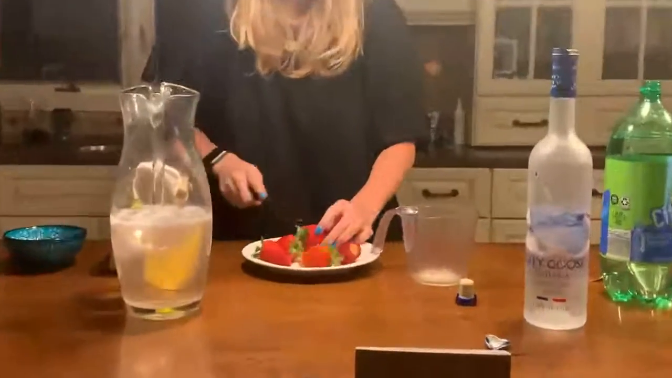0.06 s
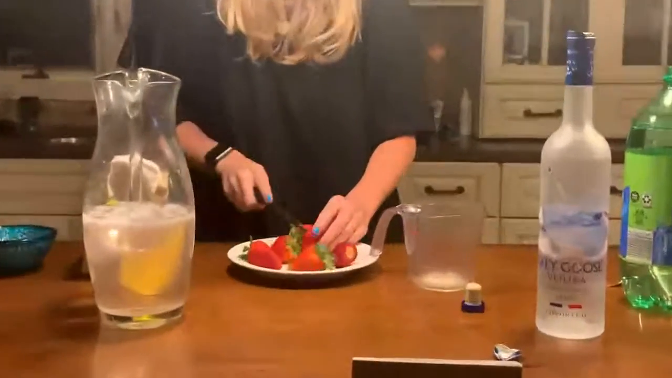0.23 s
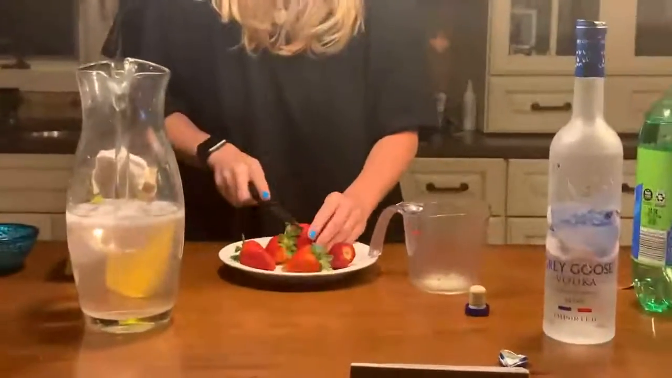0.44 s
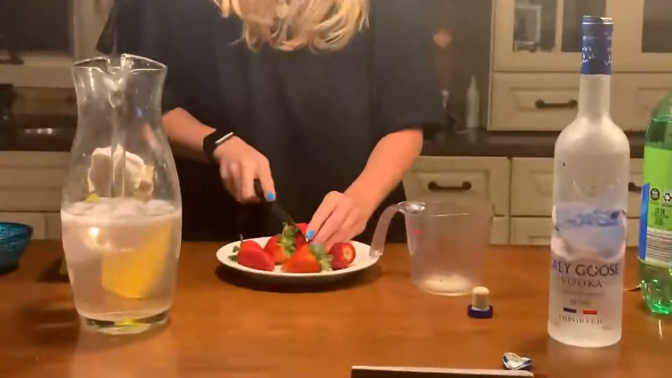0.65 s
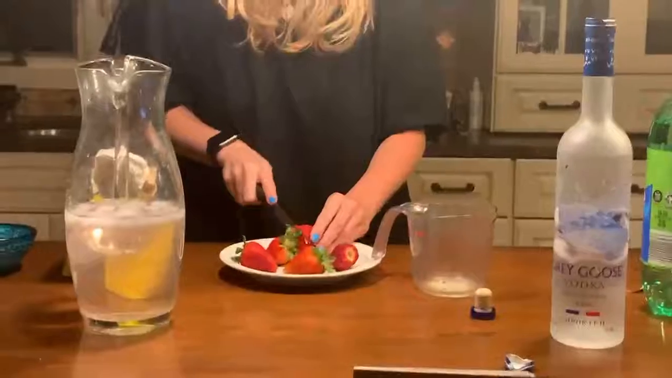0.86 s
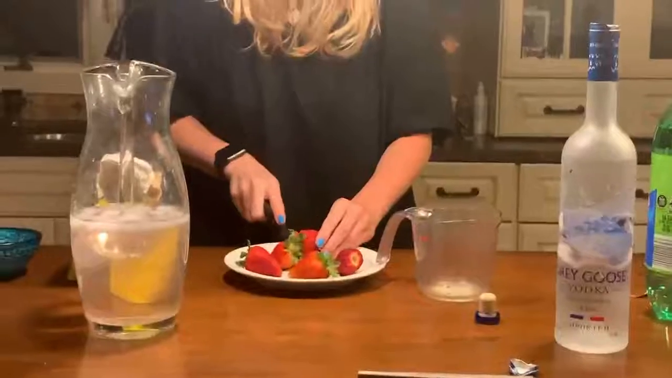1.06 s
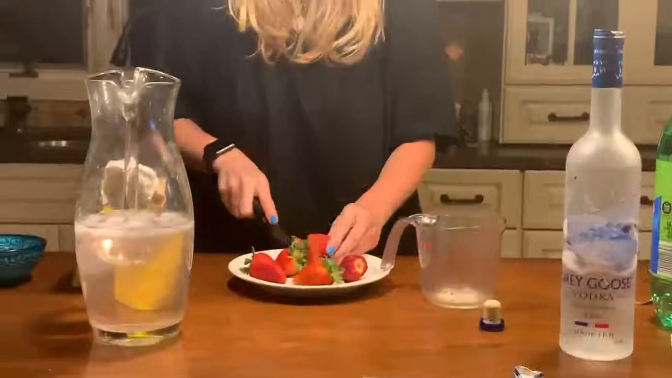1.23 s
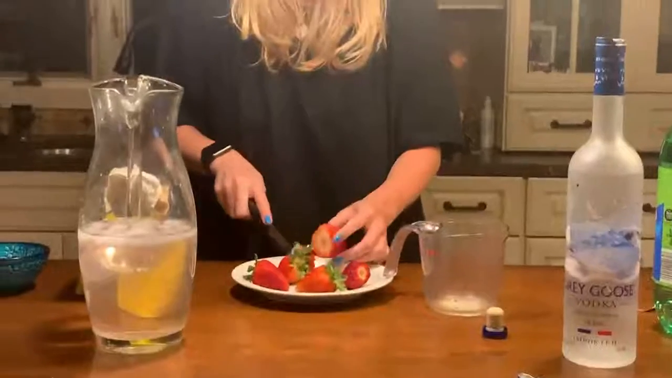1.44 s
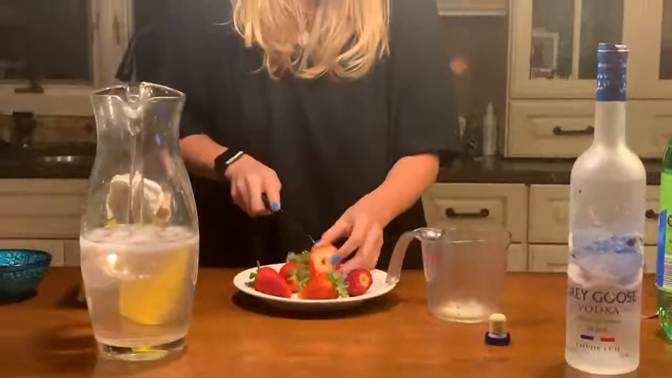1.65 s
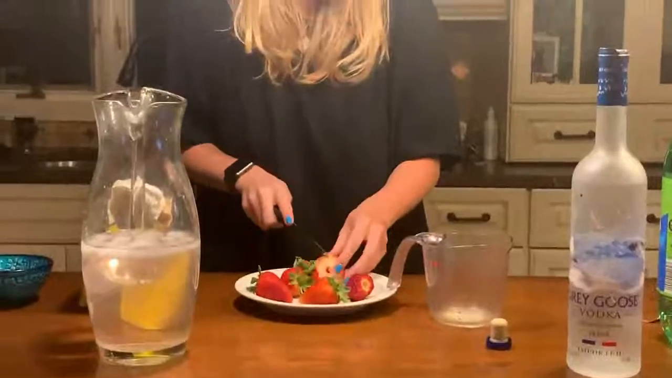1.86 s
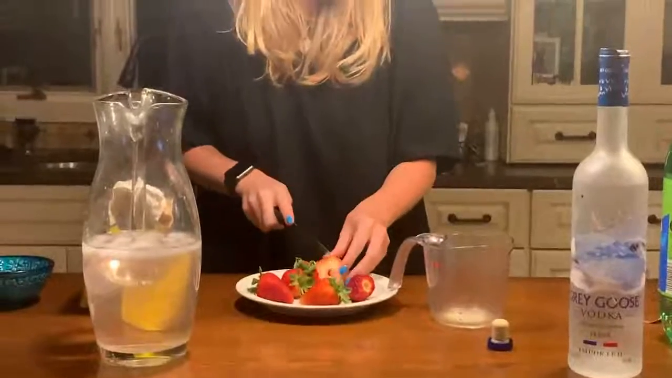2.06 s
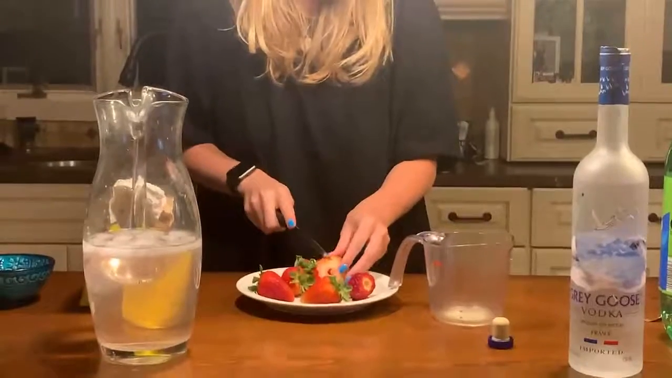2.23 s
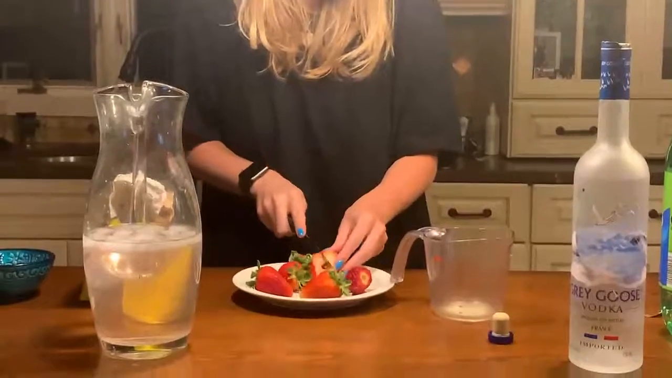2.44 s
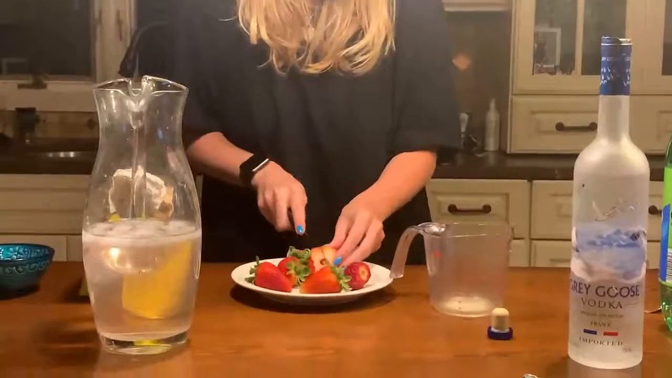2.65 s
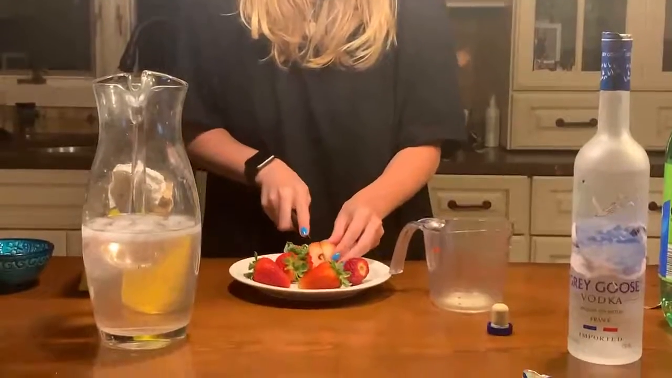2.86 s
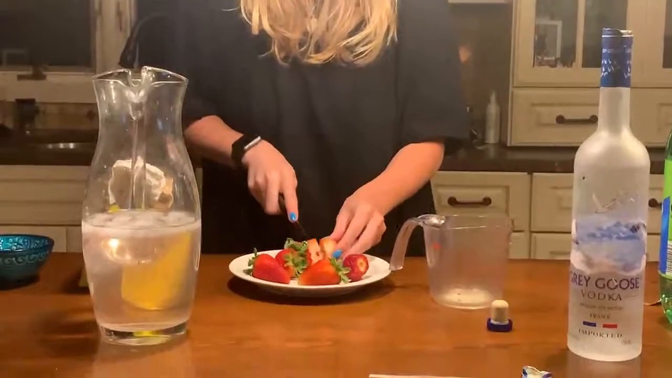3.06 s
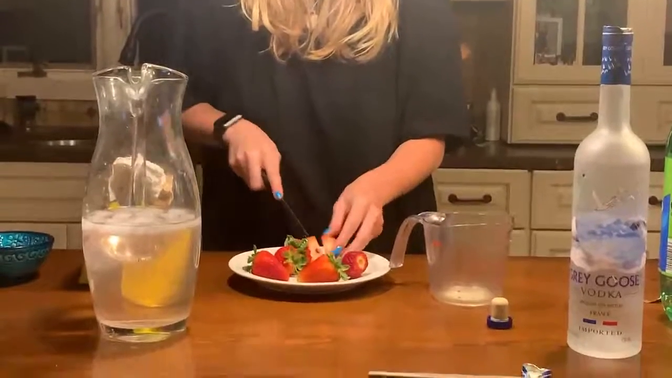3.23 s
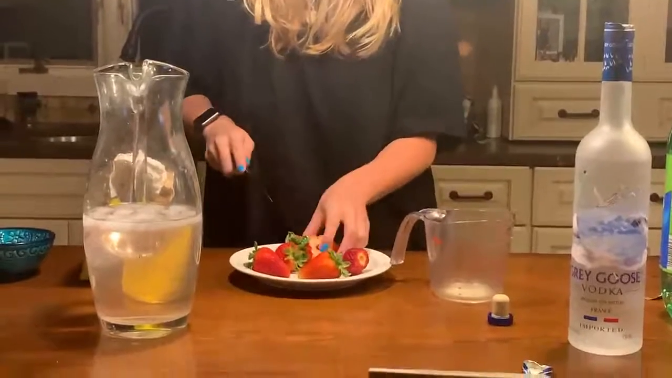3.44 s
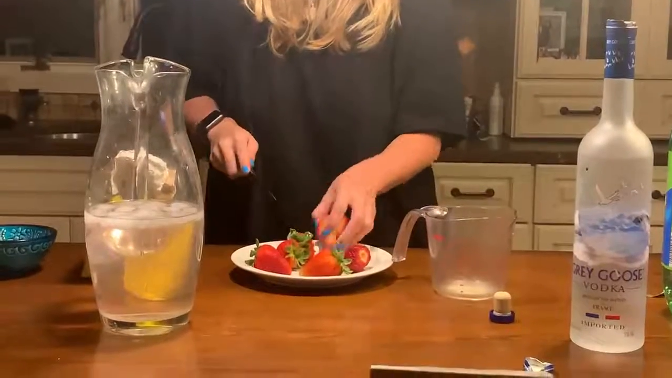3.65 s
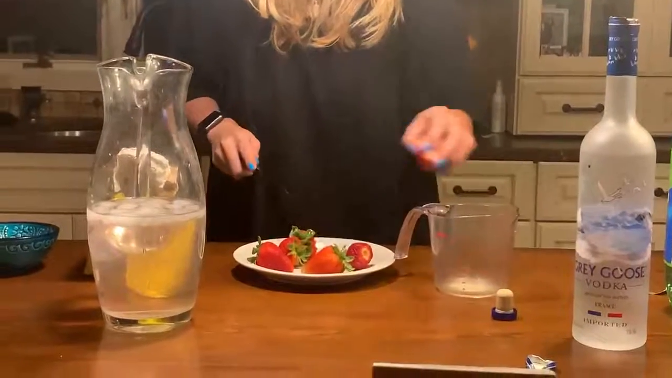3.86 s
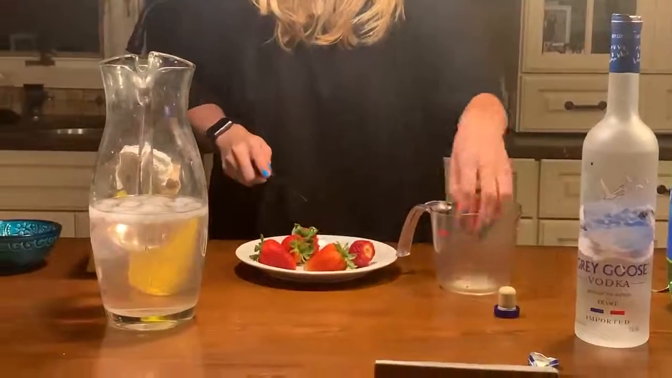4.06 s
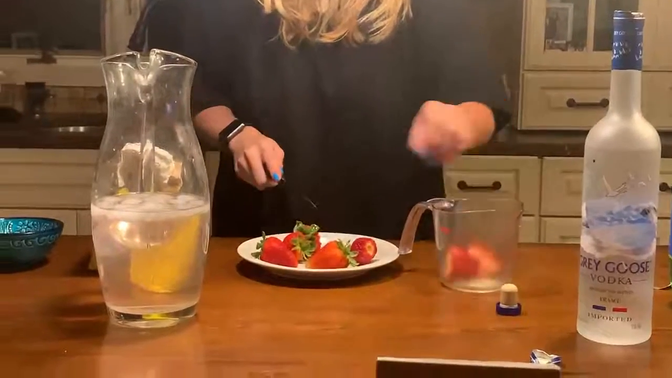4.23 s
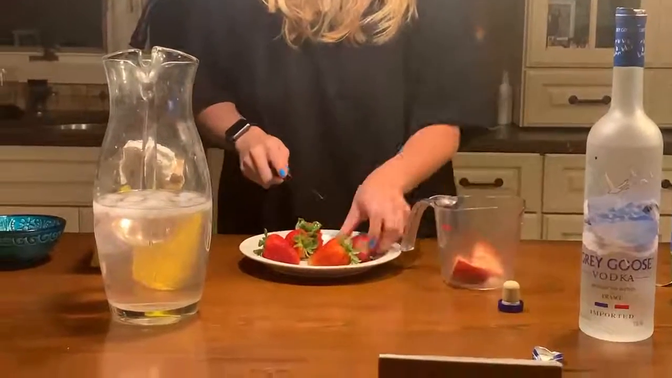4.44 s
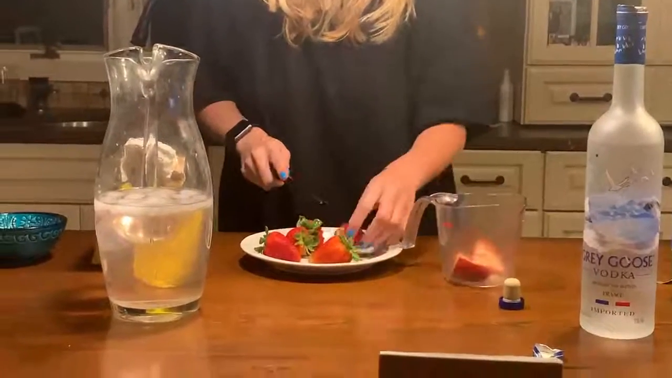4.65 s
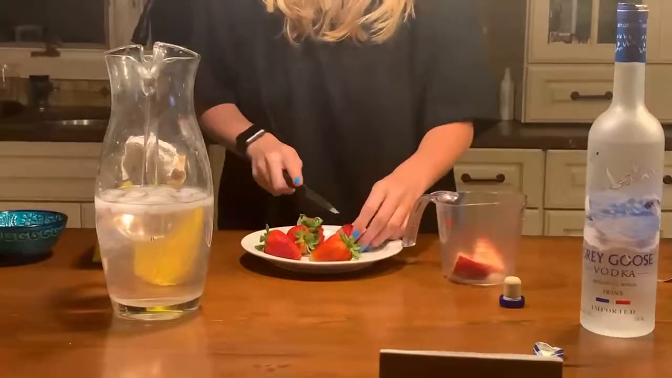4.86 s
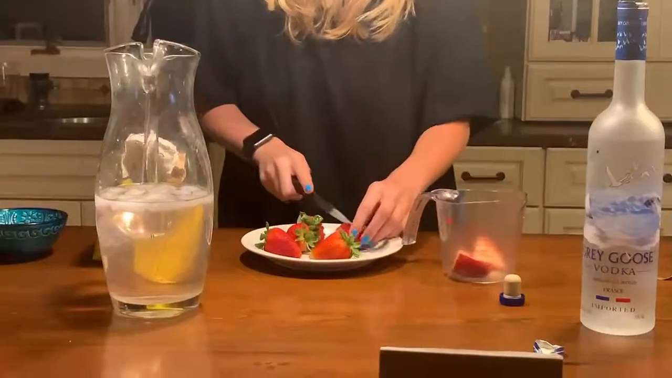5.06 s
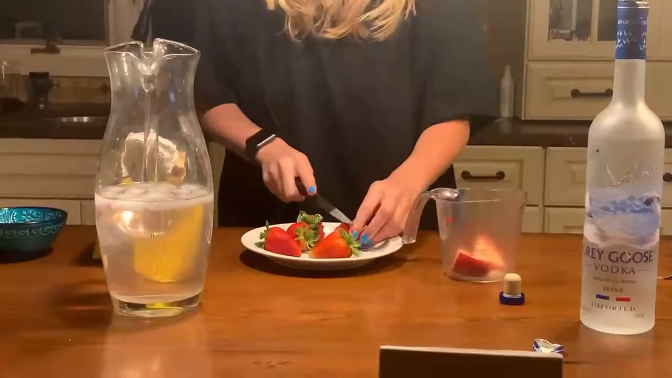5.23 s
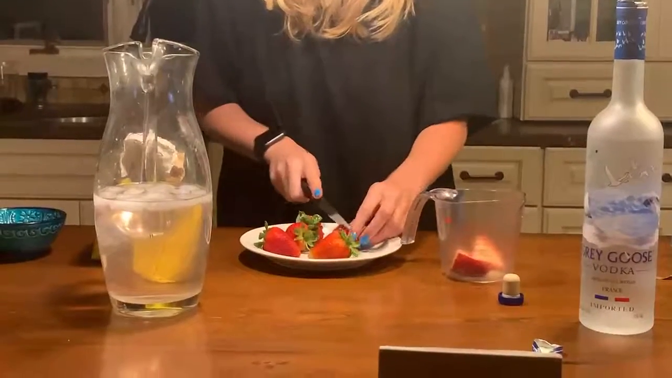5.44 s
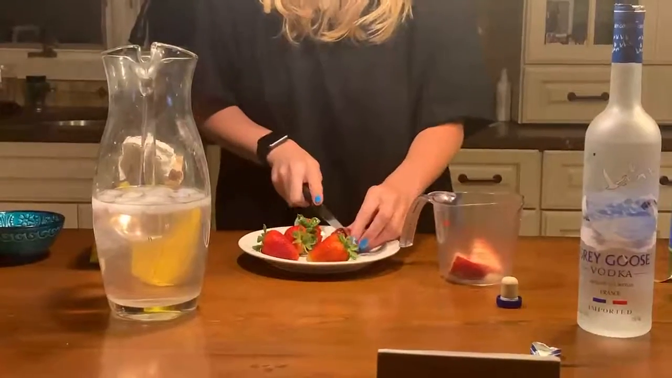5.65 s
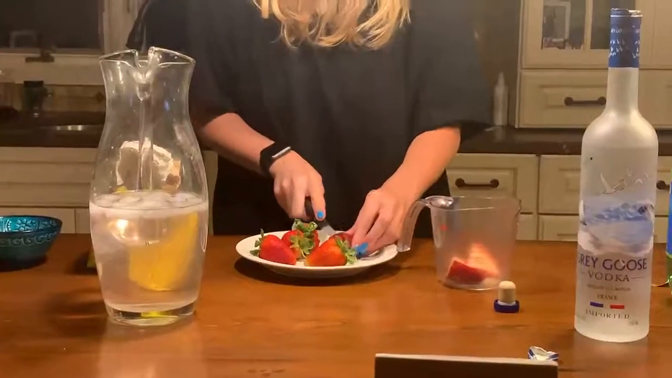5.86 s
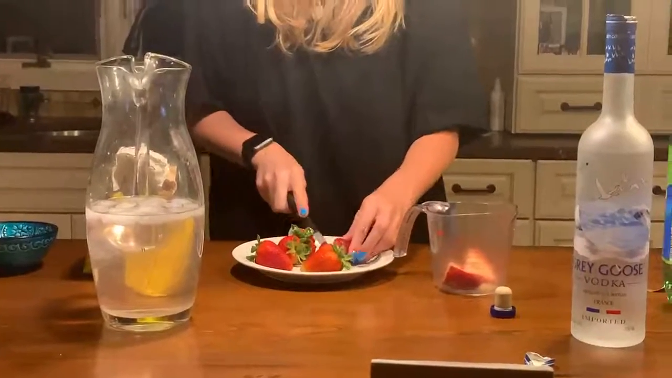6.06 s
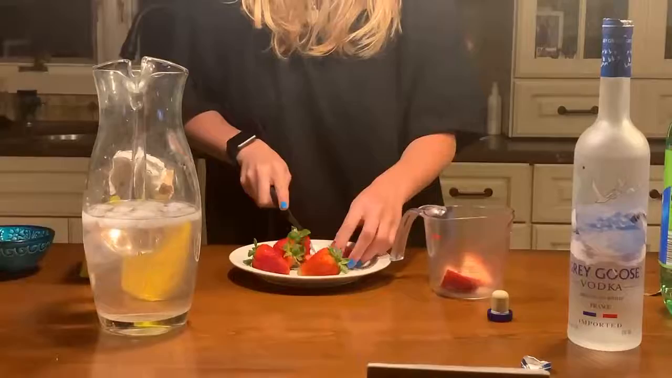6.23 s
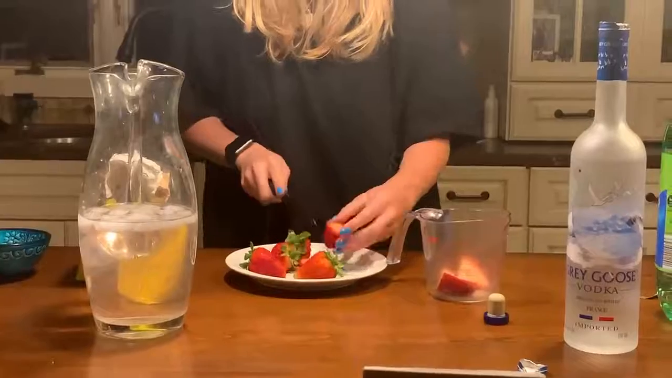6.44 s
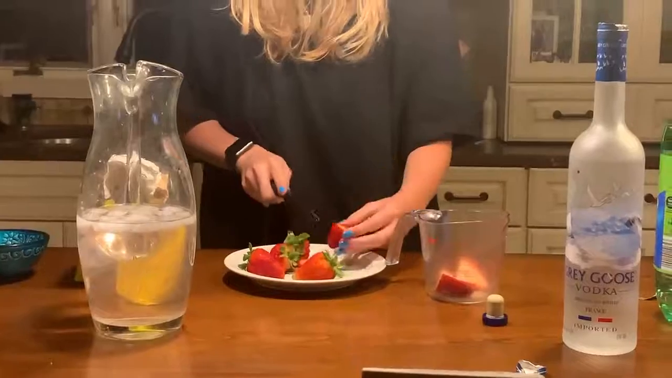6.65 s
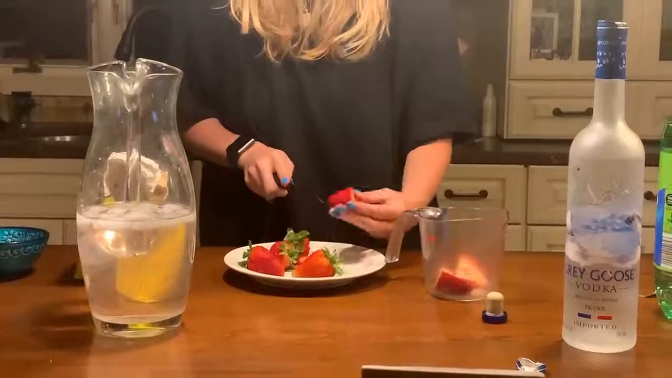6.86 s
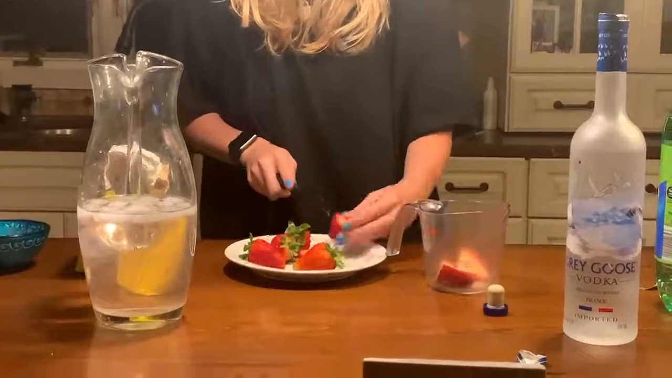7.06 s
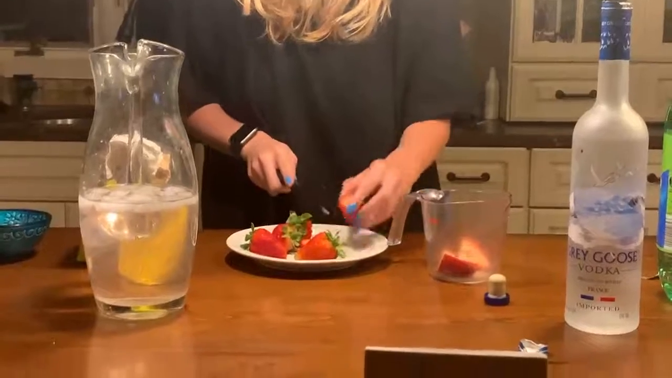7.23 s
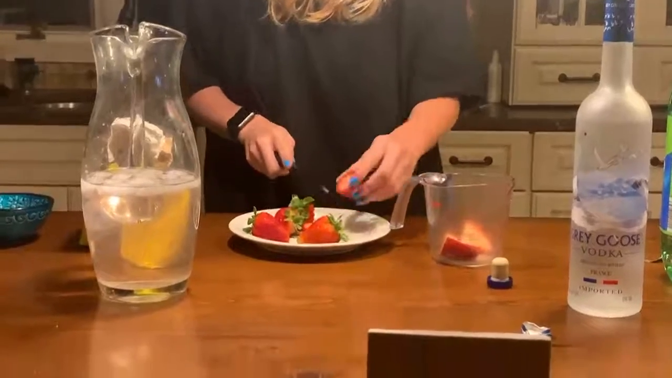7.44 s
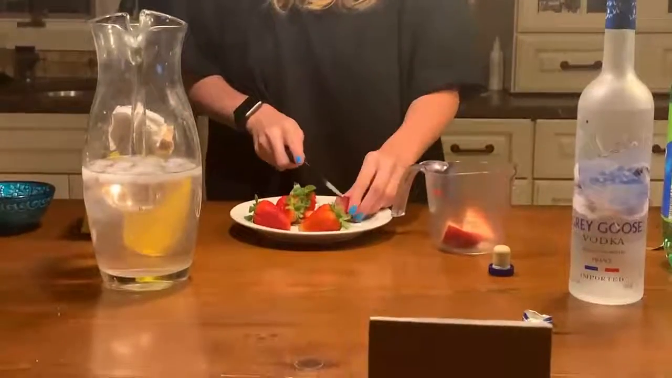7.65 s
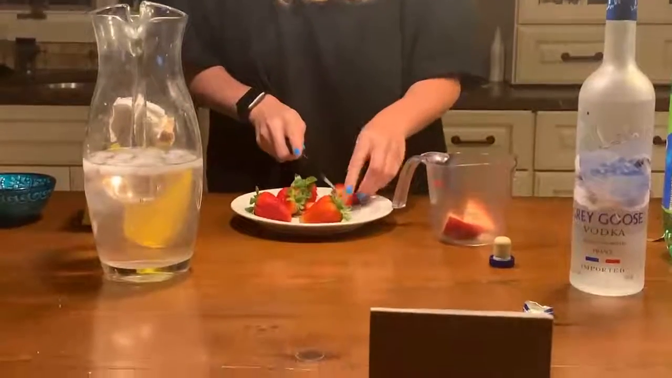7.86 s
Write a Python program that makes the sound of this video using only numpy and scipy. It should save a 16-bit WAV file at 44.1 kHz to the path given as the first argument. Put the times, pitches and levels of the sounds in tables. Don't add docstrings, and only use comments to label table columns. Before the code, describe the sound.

A quiet home kitchen with a low, slightly wavering fridge hum, soft air noise and a very faint whine throughout. At about 0.6 to 0.95 s a knife saws soft wet fruit with faint ticks, then at 1.0 s the blade lands hard on a ceramic plate: a bright, sharp clack, the loudest event, with a short room tail. A small scrape follows near 1.2 s. Gentle knocks and moist cutting come at 2.35 to 2.8 s, ending in a softer, thumpier hit at 2.8 s. From 3.05 to 3.25 s the edge scrapes the glaze in quick gritty pushes, leaving a faint glassy ring. At 4.2 s fruit drops into a hollow plastic jug with a dull plop and small bounces. Faint slicing at 5.5 s leads to another firm, more damped clack at 5.9 s. Afterwards there are only tiny taps around 7.05 and 7.6 to 7.85 s. A stereo phone listens from a metre or two.

```python
import sys
import numpy as np
from scipy import signal
from scipy.fft import rfft, irfft, next_fast_len
from scipy.io import wavfile
from scipy.ndimage import uniform_filter1d

SR = 44100
rng = np.random.default_rng(int(sys.argv[2]) if len(sys.argv) > 2 else 0)


def generate_wav(sig):
    pcm = np.round(np.clip(np.atleast_2d(sig).T, -1, 1) * 32767).astype(np.int16)
    wavfile.write(sys.argv[1], SR, pcm)


def how_loud(loudness_db):
    steps = np.asarray(loudness_db, float) / 20
    return 10 ** steps


N = 348390
TIME_S = np.arange(N) / SR
HIT_S = TIME_S[:11025]

# (frequency [Hz], density [dB/Hz])
AIR_SPECTRUM = [(12, -45.5), (20, -17), (58, -4.5), (184, -4), (258, -7), (382, -6), (416, -11.5),
                (583, -14), (709, -21.5), (1790, -33), (2810, -40), (3620, -39), (8650, -41), (10200, -36),
                (16500, -47.5)]
# (frequency [Hz], likeness [-1..1])
AIR_LIKENESS = [(60, 0.3), (300, 0.3), (700, 0.14), (1400, -0.19), (3000, -0.1)]
# (frequency [Hz], width [Hz], rms level [dB], wander [dB])
MOTOR_LINES = [(56.93, 8, -78, -1.5), (82, 10, -80, -1), (177.5, 2.7, -83, 0.5), (347, 20, -73, 2.5),
               (383.7, 21, -70.5, 2.5), (561, 7.8, -80, 3), (751, 5, -89.5, 1), (3550, 72, -91, 1.37),
               (7150, 50, -103, 5), (10500, 60, -106, 4.5)]
# (time [s], motor lines [dB], air noise [dB], extra whine [dB])
COMPRESSOR_LOAD = [(0, 4, 0, 5), (1, 3.5, 2, 1.5), (1.999, 4.5, 0.5, -2.5), (3.001, 8, -2, -2),
                   (3.799, 0.5, 0.5, 6.5), (4.5, 5, 0, 0), (5.3, 2, 0.5, 3), (6, 5.5, -0.5, 4),
                   (7.001, 0, 0.5, -1), (7.9, 4, 0.5, -2.5)]
# (time [s], peak [dB], frequency [Hz], rise [s], t60 [s])
GLASS = [
    (0, -61, 2920, 0.01, 0.13),
    (3.22, -38.5, 2844, 0.015, 0.37),
    (4.4, -60, 2850, 0.052, 0.33),
    (4.42, -73, 4096, 0.0096, 0.1),
    (1.85, -74.5, 1747, 0.18, 2),
    (4.55, -80.5, 1807, 0.12, 1.8),
    (7.119, -81, 1752, .05, 1.5),
]
# (time [s], peak [dB], frequency
# [Hz], t60 [s])
KNOCKS = [(.045, -83, 2730, 0.0061), (0.717, -57, 4500, .004), (0.731, -55, 3314, .006),
          (0.979, -39, 5770, 0.014), (1.41, -57.5, 14400, 0.0059), (1.47, -63, 11900, 0.002),
          (2.355, -57.5, 1610, 0.015), (2.475, -51, 886, 0.044), (2.539, -54, 950, .02),
          (2.553, -45.5, 960, 0.02), (4.2, -41.5, 61.5, 0.37), (5.542, -51, 1390, 0.015),
          (5.9, -36, 5620, 0.017), (4.179, -29.5, 1000, 0.028), (0.995, -36.5, 1090, 0.02),
          (7.053, -70, 1394, 0.0037), (7.054, -58.5, 500, 0.013), (7.628, -54.5, 937, 0.057),
          (7.632, -46.5, 410, 0.027), (7.686, -53, 695, 0.027), (7.71, -64, 770, 0.024),
          (7.824, -64.5, 4180, 0.023), (7.827, -66, 5500, 0.0051), (7.85, -68, 3620, 0.028)]
# (time of most effort [s], level [dB], hold [s], hiss [dB], brightness [dB])
STROKES = [(0.64, -69, 0.019, -3, -1.5), (0.715, -75, 0.014, -12, -7), (0.824, -58.5, 0.011, -11, -0.5),
           (0.939, -52.5, 0.049, -9.5, 6.5), (2.35, -66.5, 0.051, -19, -1.5),
           (2.439, -56.5, 0.043, -25, -2.5), (2.555, -65, .008, -30, -2), (2.604, -61.5, .07, -18.5, 7),
           (2.797, -63.5, .018, -16.5, 8.5), (5.475, -74, 0.026, -21.5, -6.5),
           (5.532, -65, 0.0089, -14.5, -1.5), (5.664, -62, 0.022, -13.5, 1.5),
           (5.811, -67, 0.064, -9.5, 12), (5.877, -60, 0.044, -14, 1)]
# (frequency [Hz], density [dB/Hz])
FLESH_SPECTRUM = [(150, -36), (250, -9), (381, -3), (605, -15), (922, -1.5), (1150, -9), (2300, -9),
                  (2660, -15.5), (7120, -31.5), (8000, -44), (10400, -73.5), (17600, -120)]
# (time [s], peak [dB], length [s])
EDGE_TICKS = [(.655, -61.5, 0.00052), (.68, -61.5, 0.00044), (.718, -51.5, .001), (.733, -56, 0.0011),
              (.994, -30.5, 0.00075), (1.19, -48, 0.0042), (2.816, -39, 0.0021), (3.05, -60, .002),
              (5.65, -57, .0005), (5.907, -33, .0012), (6.47, -59.5, 0.00045), (7.826, -50.5, 0.0014)]
# (frequency [Hz], density [dB/Hz])
EDGE_SPECTRUM = [(1500, -29.5), (3500, -9.5), (7000, -8), (10500, 0), (15000, 1), (17000, -4.5)]
# (time [s], peak [dB], crack [dB], thump [dB], left minus right [dB])
LANDINGS = [
    (0.995, -13.5, -16, -35, -1.5),
    (2.817, -24.5, -13.5, -12, 0.5),
    (5.908, -16.5, -12.5, -17, 0),
]
# (frequency [Hz], width [Hz], level [dB])
PLATE_MODES = [
    [(440, 43, -18.5), (944, 27, -14), (2011, 32, 2), (2275, 45, -2.5), (2810, 27, -8), (3355, 60, -11),
     (4180, 49, -19), (5210, 31, -5.5), (5636, 51, -18), (6310, 70, -5.5), (6850, 51, -14),
     (10700, 60, -15), (15050, 57, -19.5)],
    [(499, 30, -11.5), (1025, 26, -7), (2005, 40, 0.5), (2280, 44, -3.5), (3137, 40, -16), (3398, 53, -5),
     (5210, 60, -12.5), (6283, 87, -13), (10410, 50.6, -16.5), (10970, 40, -20.5), (11300, 30, -27),
     (12750, 99, -36), (15500, 74, -21.5)],
    [(637, 60, -5), (967, 47, -8.5), (1250, 19, -11), (1971, 47, -3), (2893, 40, -10.5), (3397, 28, -3),
     (5212, 90, -3.5), (6370, 140, -19.5), (8000, 140, -16), (10855, 130, -13.5), (13000, 45, -26.5),
     (14260, 70, -26.5), (15890, 55, -19)],
]
# (frequency [Hz], density [dB/Hz])
CRACK_SPECTRUM = [(100, -27.5), (300, -2), (1200, -3), (1600, -5), (3000, -0.5), (4000, -23.5), (6000, -5),
                  (8500, -21), (10500, -11.5), (13000, -25.5), (16000, -20)]
# (start [s], pressure [dB], hold [s], brightness [dB], grit [dB])
PUSHES = [
    (1.171, -43.5, 0.021, 2.5, -10.5),
    (1.229, -51, .008, -5, 0),
    (3.047, -34.5, 0.044, -1.5, -5.5),
    (3.096, -35.5, 0.013, -1.5, -4.5),
    (3.136, -28.5, 0.019, 1, -17.5),
    (3.157, -32, 0.02, 2, -7.5),
    (3.201, -39, .012, -1, -15.5),
    (3.243, -51.5, .01, -7, -5),
]
# (frequency [Hz], width [Hz], level [dB])
SCRAPED_MODES = [(945, 45, 4.5), (1945.5, 27, 3.5), (2210, 200, -8.5), (2877, 26, -3), (3200, 69, -11.5),
                 (3380, 180, -11), (4184, 46, -9), (5250, 39, -17.5), (5550, 40, -14.5), (7140, 50, -23),
                 (8825, 63, -28.5), (10500, 29, -23.5), (12230, 46, -31.5), (15000, 30, -24)]
# (frequency [Hz], density [dB/Hz])
GRIT_SPECTRUM = [(100, -34), (250, -3), (700, 1.5), (1400, 1.5), (3000, -3), (4500, -22), (7000, -29),
                 (9000, -47.5), (16000, -61)]
# (time [s], peak [dB], crack [dB])
DROPS = [
    (4.177, -25, -2),
    (4.2, -43.5, -5),
    (4.245, -37, -1),
    (4.27, -51, 0),
    (4.329, -45, -9),
]
# (frequency [Hz], width [Hz], level [dB])
JUG_MODES = [(215.5, 66, 1), (779, 104, 4), (955, 81, -16), (1805, 19, -7), (2105, 44, -20),
             (2848, 24, -12), (3510, 32, -22.5)]
# (frequency [Hz], density [dB/Hz])
SPLAT_SPECTRUM = [(88, -48), (150, 7), (767, -5), (2400, -12), (3100, -54), (3500, -26), (7000, -31),
                  (8450, -41), (11600, -27), (16500, -44)]
# (frequency [Hz], t60 [s], level [dB], likeness of ports [-1..1])
ROOM_OCTAVES = [(61.4, 1, -5.5, .9), (125, 1, -1.5, 0.7), (249.6, 0.54, 2.5, 0.99), (500, 0.57, 4.5, 0.3),
                (1000, 0.71, -1, 0), (2100, 0.66, 0.5, 0.06), (4050, 0.62, 5, -.2), (8400, 0.42, 1, 0.2),
                (16000, .2, 0, -.3)]
# (frequency [Hz], gain [dB])
OVERALL_RESPONSE = [(7400, -0.5), (8000, -4.5), (8700, -11), (9500, 0.5), (12600, 1.5), (13400, -7),
                    (14100, 2.5), (15800, 4), (16100, -19.5)]

AIR_DB, WHINE_ABOVE_HZ = -66.8, 2000
BEATS_PER_T60 = 3.3
STROKE_ATTACK_S, STROKE_RELEASE_DB_PER_S = 0.068, 349.5
PUSH_ATTACK_S, PUSH_RELEASE_DB_PER_S = 0.003, 453
SKIRT_Q = 3.1
EARLY_DB, EARLY_S = 1.5, 0.033
PORT_LAG_S = 0.000092
TICK_ROOM_DB = -9.5


def unit(x):
    return x / np.sqrt(np.mean(x ** 2))


def colour(x, points):
    log_hz = np.log(np.maximum(np.fft.rfftfreq(x.shape[-1], 1 / SR), 1))
    hz, db = np.transpose(points)
    return irfft(rfft(x) * how_loud(np.interp(log_hz, np.log(hz), db)), x.shape[-1])


def halves(x, hz):
    low = signal.sosfilt(signal.butter(2, hz, fs=SR, output="sos"), x)
    return low, x - low


def walk(rate_hz, size=N):
    k = int(SR / rate_hz)
    held = rng.standard_normal(size=1024)[np.arange(size) // k]
    return 1.51 * uniform_filter1d(uniform_filter1d(held, k), k)


def pair(likeness, size):
    mid, side = rng.standard_normal((2, size))
    c = np.clip(likeness, -1, 1)
    return mid * np.sqrt((1 + c) / 2) + side * np.sqrt((1 - c) / 2) * np.array([[1], [-1]])


def grains(per_s, spread_db, size):
    chance, tail = rng.random(size), rng.exponential(size=size)
    return (chance < per_s / SR) * how_loud(spread_db * tail) * rng.standard_normal(size)


def effort(s, hold_s, attack_s, release_db_per_s):
    rise = np.clip(1 + (TIME_S - s) / attack_s, 0, 1)
    return rise ** 2 * how_loud(-release_db_per_s * np.maximum(TIME_S - s - hold_s, 0))


def ring(x, hz, width_hz):
    r = np.exp(-np.pi * width_hz / SR)
    return signal.lfilter([.5, 0, -.5], [1, -2 * r * np.cos(2 * np.pi * hz / SR), r * r], x)


def body(x, modes, split=0.0041, lift_db=0.5):
    signs = rng.choice([-1, 1], len(modes))
    out = 0
    for sign, (hz, width_hz, db) in zip(signs, modes):
        near = signal.lfilter(*signal.iirpeak(hz, SKIRT_Q, fs=SR), x)
        twins = ring(near, hz * (1 - split), width_hz) + 0.8 * ring(near, hz * (1 + split), width_hz)
        out = out + sign * how_loud(db + lift_db * np.log2(hz / 1000)) * width_hz * twins
    return out


def blow(modes, crack_db, crack_s, crack_spectrum, chatter_s):
    push = rng.standard_normal(len(HIT_S)) * np.exp(-HIT_S / chatter_s) / 9
    push[0] = 1
    tone = body(push, modes)
    crack = unit(colour(rng.standard_normal(len(HIT_S)), crack_spectrum)) * np.exp(-HIT_S / crack_s)
    return tone / np.abs(tone).max() + how_loud(crack_db) * crack


def add(out, s, x):
    i = int(s * SR)
    out[..., i:i + x.shape[-1]] += x[..., :N - i]


def fridge():
    size = next_fast_len(N)
    octave = np.log2(np.maximum(np.fft.rfftfreq(size, 1 / SR), 1))
    mid, side = rfft(rng.standard_normal((2, size)))
    hz, likeness = np.transpose(AIR_LIKENESS)
    likeness = np.clip(np.interp(octave, np.log2(hz), likeness), -.9, .95)
    side = side * np.sqrt((1 - likeness) / (1 + likeness))
    air = rfft(unit(colour(irfft(mid + side * [[1], [-1]], size), AIR_SPECTRUM)))
    s, *load = np.transpose(COMPRESSOR_LOAD)
    motor_db, air_db, whine_db = (np.interp(TIME_S, s, c) for c in load)
    out = 0
    for centre in np.arange(4, 16, 2):
        share = np.clip(1 - np.abs(octave - centre) / 2, 0, 1)
        out = out + irfft(air * share, size)[:, :N] * how_loud(2.7 * walk(6.9))
    out = how_loud(AIR_DB + air_db) * out
    for hz, width_hz, db, wander_db in MOTOR_LINES:
        level_db = db + motor_db + whine_db * (hz > WHINE_ABOVE_HZ) + wander_db * walk(3)
        out = out + how_loud(level_db) * unit(ring(pair(0.13, N), hz, width_hz))
    return out


def glass():
    out, t = np.zeros(N), TIME_S[:SR]
    for s, db, hz, rise_s, t60_s in GLASS:
        twin_hz = hz + BEATS_PER_T60 / t60_s
        lines = np.sin(2 * np.pi * hz * t) + .7 * np.sin(2 * np.pi * twin_hz * t)
        add(out, s, how_loud(db - 60 * t / t60_s) * (1 - np.exp(-(t / rise_s) ** 2)) * lines)
    return out


def knocks():
    out, t = np.zeros(N), TIME_S[:SR]
    for s, db, hz, t60_s in KNOCKS:
        add(out, s, how_loud(db + 4.5 - 60 * t / t60_s) * np.sin(2 * np.pi * hz * t))
    return out


def cuts():
    wet = (grains(2000, 2.7, size=N) + 0.54 * rng.standard_normal(N)) * how_loud(4.0 * walk(40))
    flesh = unit(colour(wet, FLESH_SPECTRUM)) + how_loud(-12) * unit(body(wet, SCRAPED_MODES[:8]))
    low, high = halves(flesh, 3800)
    hiss = unit(colour(wet, [(5000, -30), (7000, -9.0), (10500, -4.0), (16000, -1.0)]))
    out = 0
    for s, db, hold_s, hiss_db, tilt_db in STROKES:
        stroke = effort(s, hold_s, STROKE_ATTACK_S, STROKE_RELEASE_DB_PER_S)
        tone = low / how_loud(tilt_db) + high * how_loud(tilt_db)
        out = out + how_loud(db) * stroke * (tone + how_loud(hiss_db + 4.0) * hiss)
    return out


def ticks():
    out = np.zeros(N)
    for s, db, length_s in EDGE_TICKS:
        spark = unit(colour(rng.standard_normal(len(HIT_S)), EDGE_SPECTRUM))
        add(out, s, how_loud(db) * spark * np.exp(-HIT_S / length_s))
    return out


def strikes():
    out = np.zeros((2, N))
    for (s, db, crack_db, thump_db, pan_db), modes in zip(LANDINGS, PLATE_MODES):
        push = rng.standard_normal(len(HIT_S)) * np.exp(-HIT_S / 0.0021)
        thump = body(push, [(263, 100, -0.5), (518.5, 750, -9.5), (1035, 750, -3.5)])
        hit = blow(modes, crack_db, 0.0045, CRACK_SPECTRUM, 0.0014)
        hit = hit + how_loud(thump_db) * thump / np.abs(thump).max()
        add(out, s - .001, how_loud(db + 3.5 + np.array([[pan_db], [-pan_db]]) / 2) * hit)
    return out


def scrapes():
    slips = grains(2500, 1.1, size=N) * how_loud(0.96 * walk(90))
    tone_low, tone_high = halves(unit(body(slips, SCRAPED_MODES, split=0.00083)), 1600)
    grit_low, grit_high = halves(unit(colour(slips, GRIT_SPECTRUM)), 1600)
    out = 0
    for s, db, hold_s, tilt_db, grit_db in PUSHES:
        low = tone_low + how_loud(grit_db) * grit_low
        high = tone_high + how_loud(grit_db) * grit_high
        push = effort(s + PUSH_ATTACK_S, hold_s, PUSH_ATTACK_S, PUSH_RELEASE_DB_PER_S)
        out = out + how_loud(db) * push * (low / how_loud(tilt_db) + high * how_loud(tilt_db))
    return out


def jug():
    out = np.zeros(N)
    for s, db, splat_db in DROPS:
        add(out, s, how_loud(db) * blow(JUG_MODES, splat_db, 0.0064, SPLAT_SPECTRUM, 0.00085))
    return out


def kitchen():
    t = TIME_S[:SR]
    octave = np.log2(np.maximum(np.fft.rfftfreq(SR, 1 / SR), 1))
    tail = 0
    for hz, t60_s, db, likeness in ROOM_OCTAVES:
        share = np.sqrt(np.clip(1 - np.abs(octave - np.log2(hz)), 0, 1))
        energy = np.sqrt(t60_s * SR / (2 * np.log(1000)))
        noise = irfft(rfft(pair(likeness, SR)) * share, SR)
        tail = tail + noise * how_loud(db - 60 * t / t60_s) / energy
    tail = tail * how_loud(EARLY_DB * np.exp(-t / EARLY_S)) * np.clip((t - .002) / 0.0035, 0, 1)
    lag = np.array([[-PORT_LAG_S], [PORT_LAG_S]]) * SR / 2
    tail[:, :32] += np.sinc(np.arange(32) - 16 - lag) * np.hanning(32)
    return tail


def scene():
    hum = fridge()
    table = glass() + knocks() + cuts() + strikes() + scrapes() + jug()
    sparks, room = ticks(), kitchen()
    wet = signal.fftconvolve(table + how_loud(TICK_ROOM_DB) * sparks, room, axes=1)[:, 16:N + 16]
    return wet + (1 - how_loud(TICK_ROOM_DB)) * sparks + hum


def roll_off(x):
    return signal.sosfilt(signal.butter(12, 16970, fs=SR, output="sos"), x)


def record(dry):
    return roll_off(colour(dry, OVERALL_RESPONSE))


dry = scene()
out = record(dry)
generate_wav(out)
```